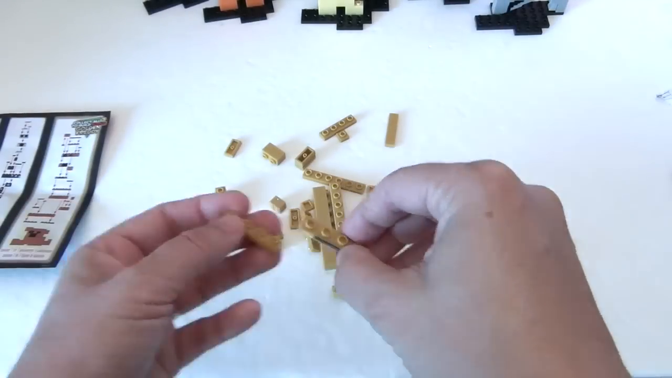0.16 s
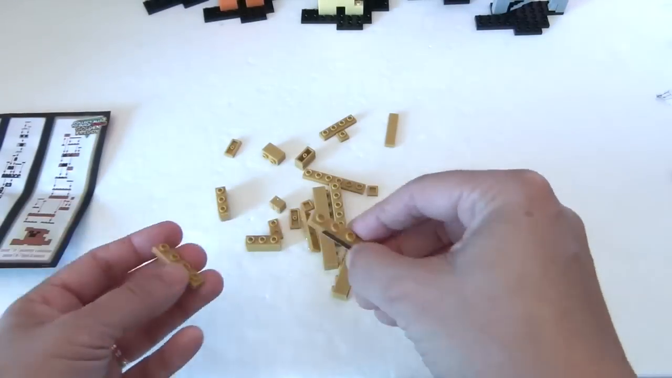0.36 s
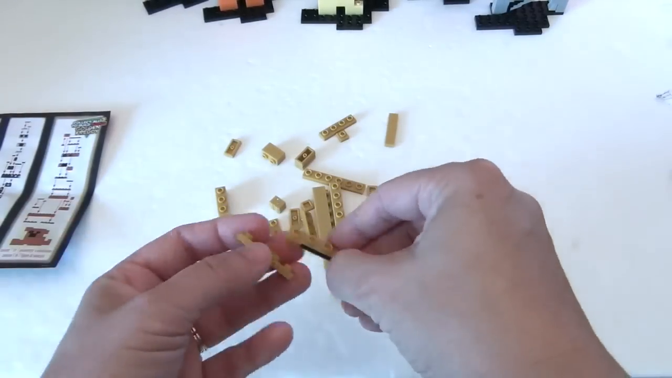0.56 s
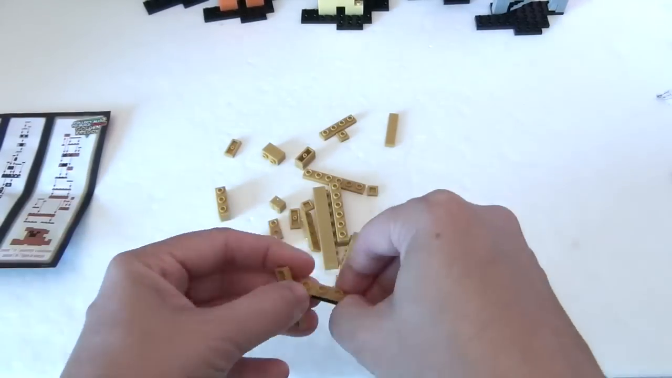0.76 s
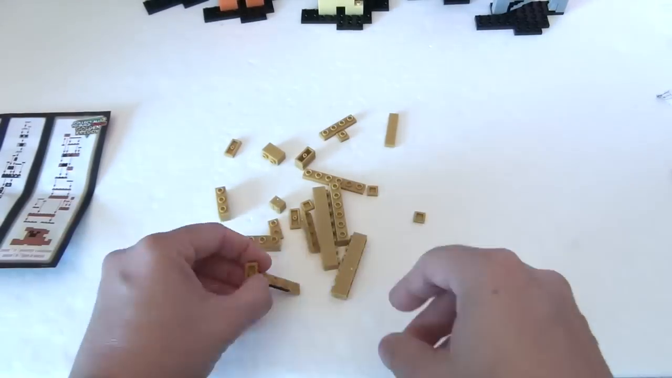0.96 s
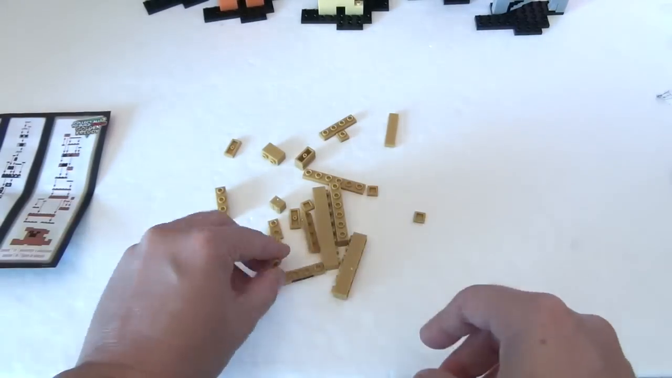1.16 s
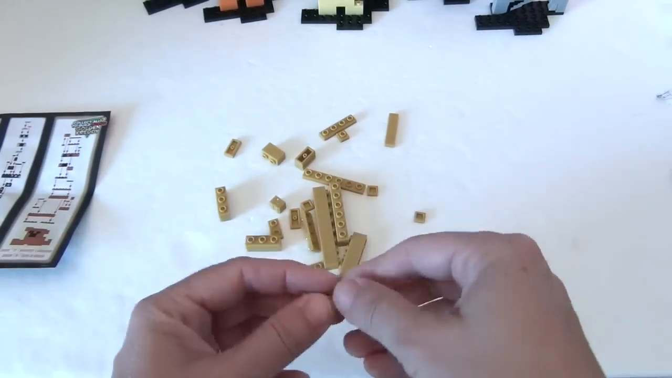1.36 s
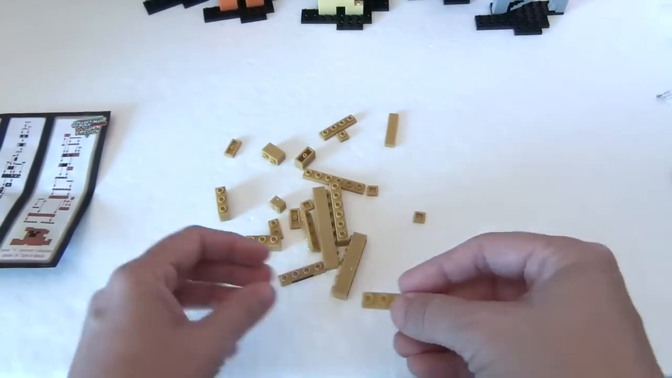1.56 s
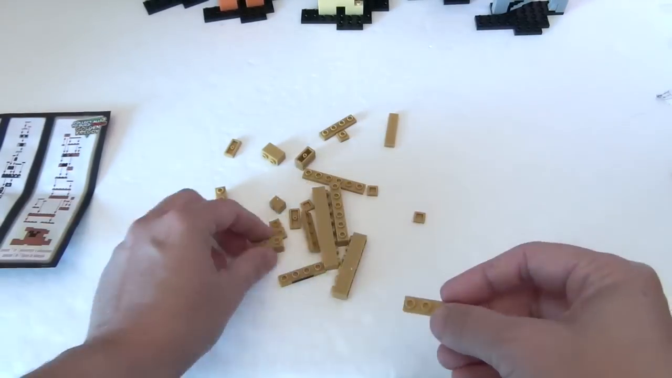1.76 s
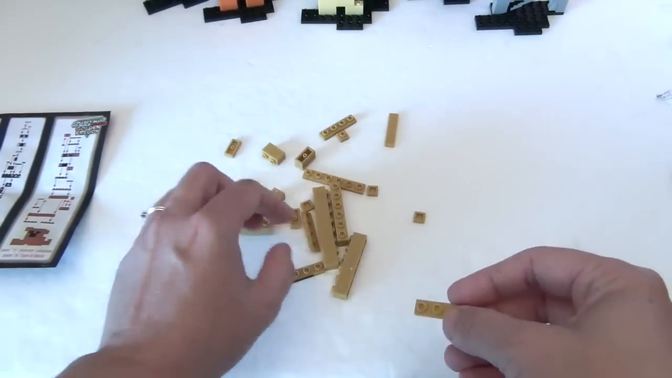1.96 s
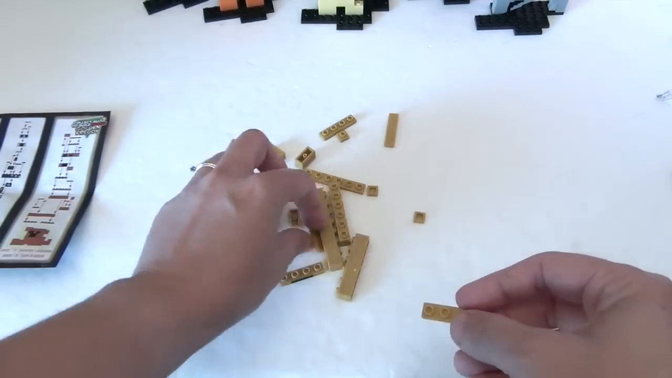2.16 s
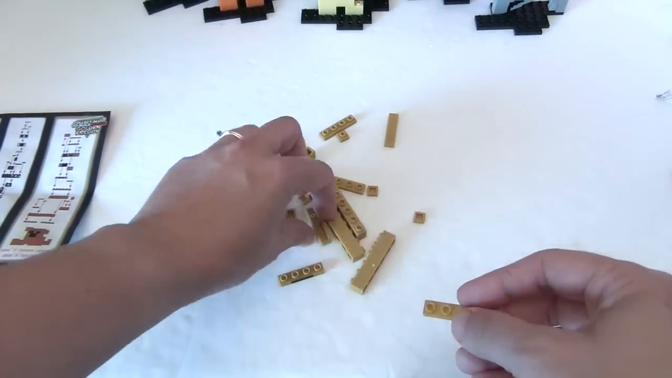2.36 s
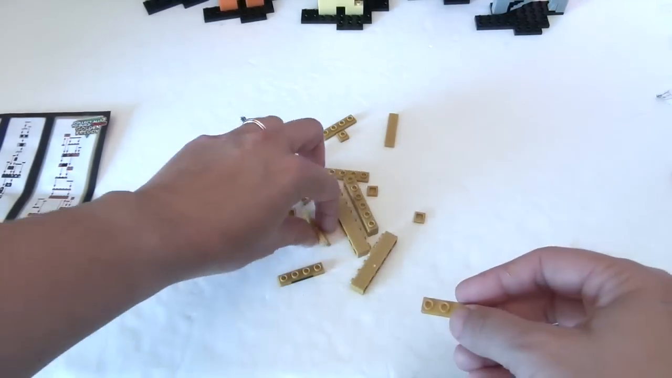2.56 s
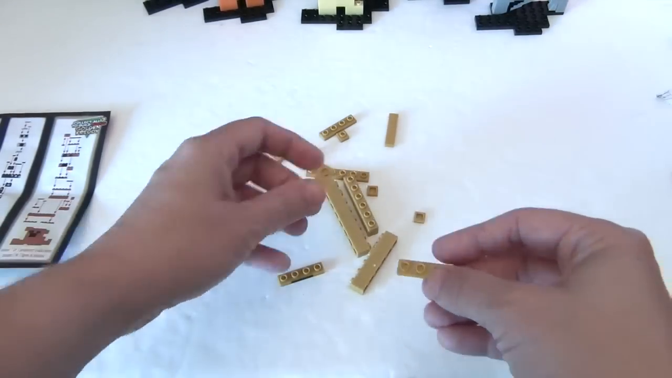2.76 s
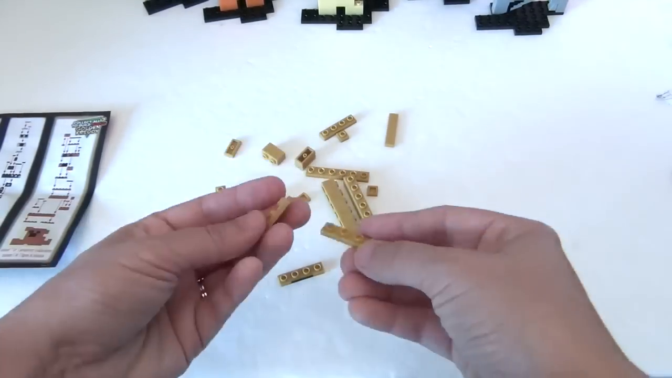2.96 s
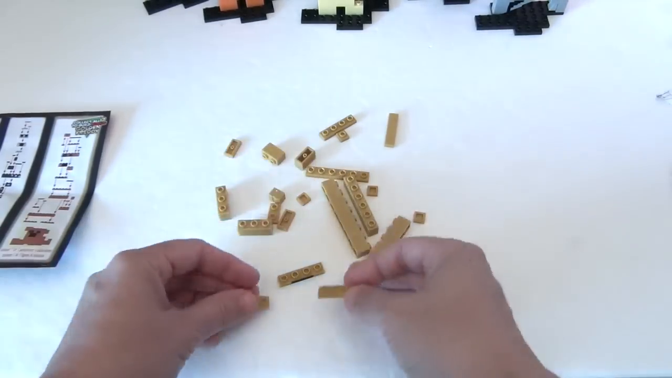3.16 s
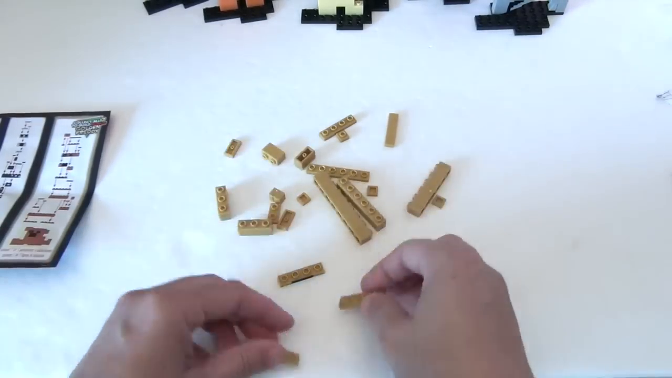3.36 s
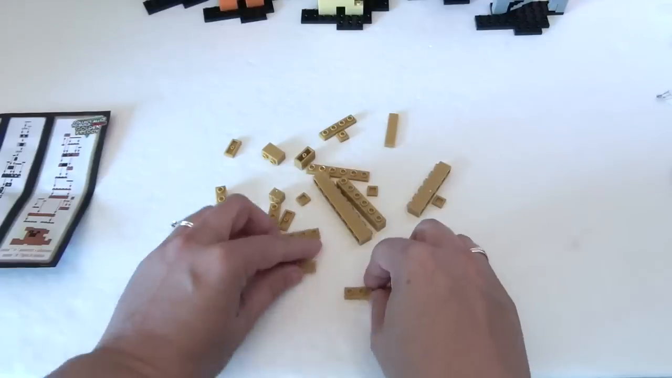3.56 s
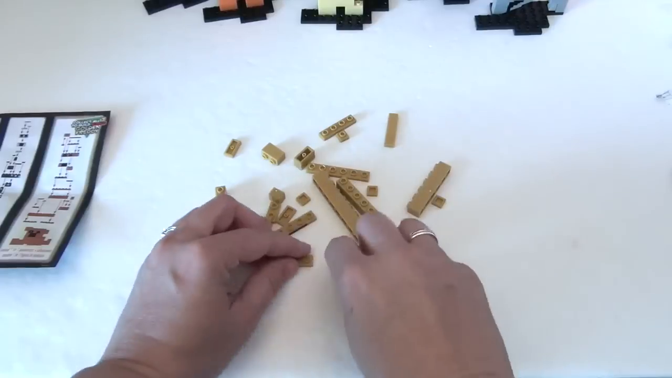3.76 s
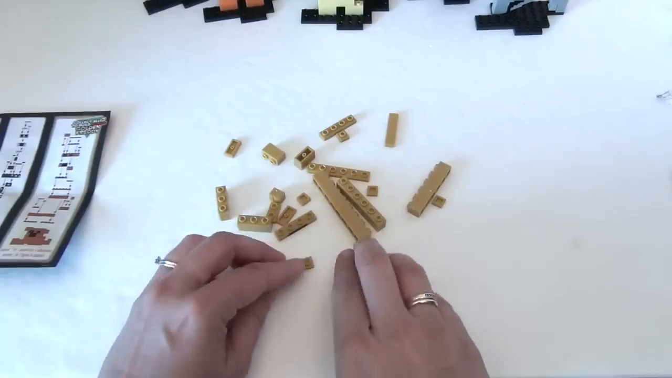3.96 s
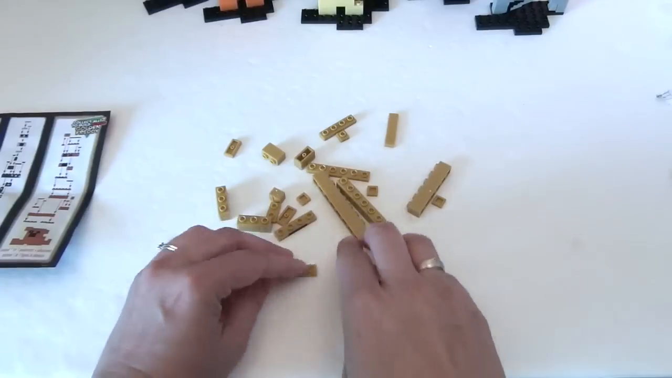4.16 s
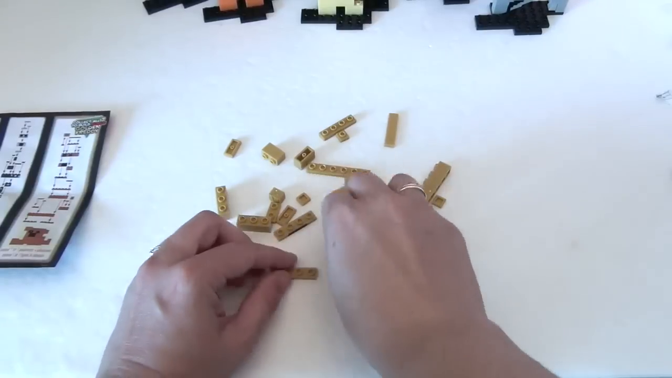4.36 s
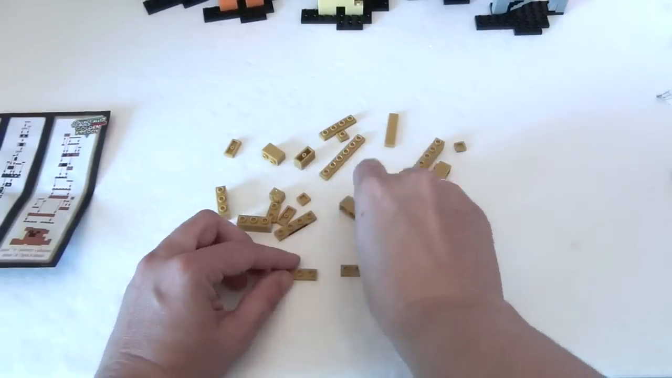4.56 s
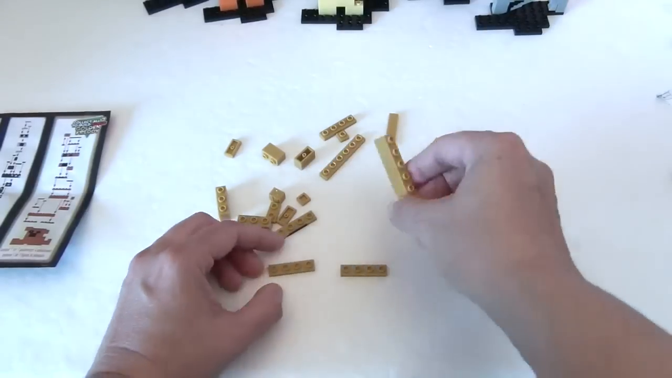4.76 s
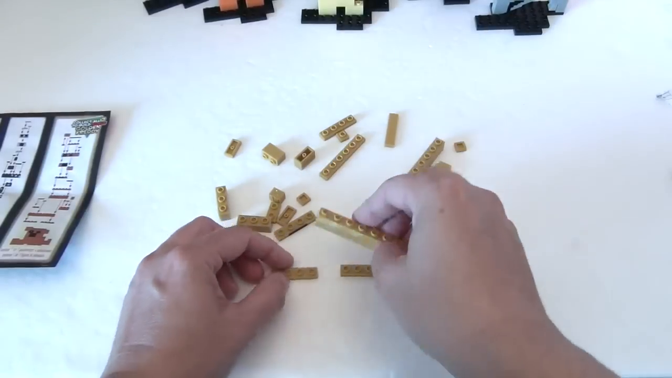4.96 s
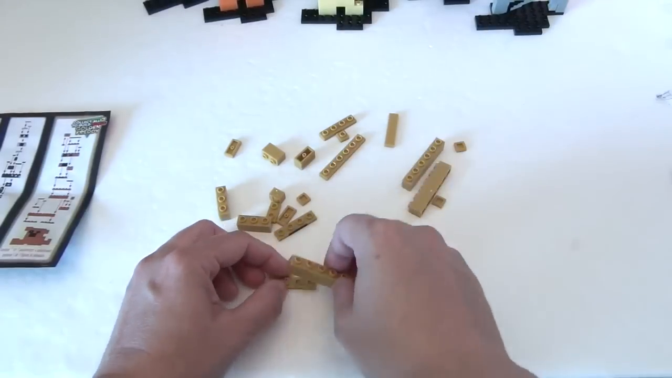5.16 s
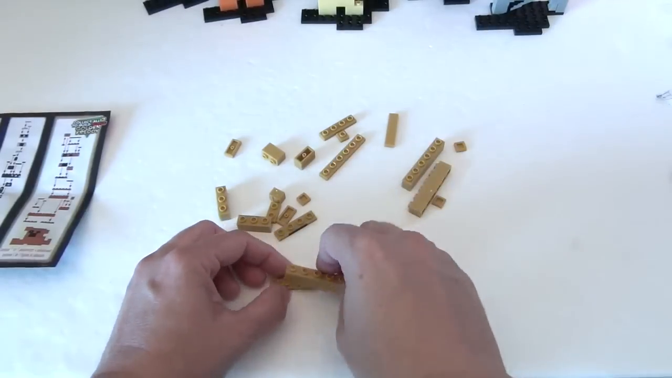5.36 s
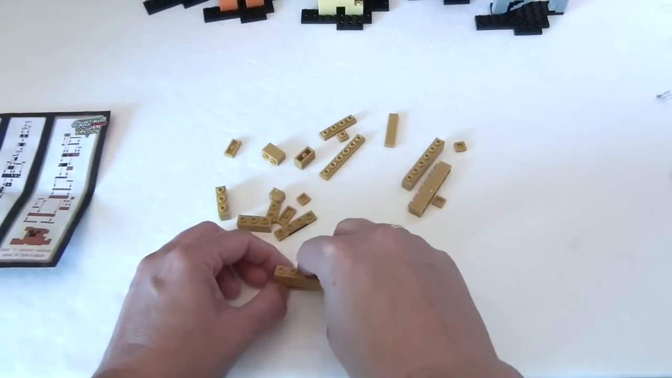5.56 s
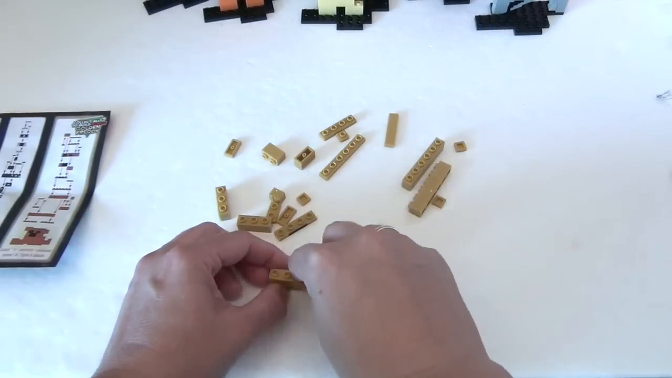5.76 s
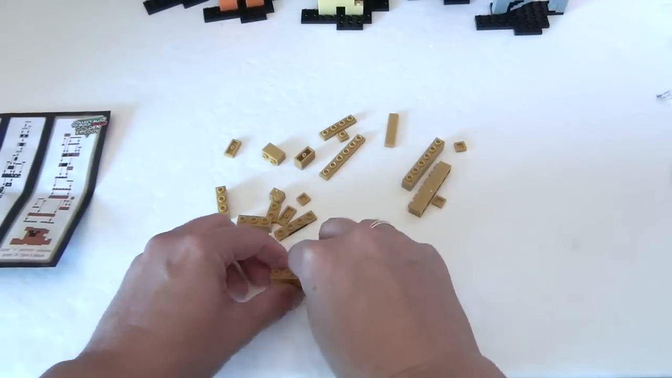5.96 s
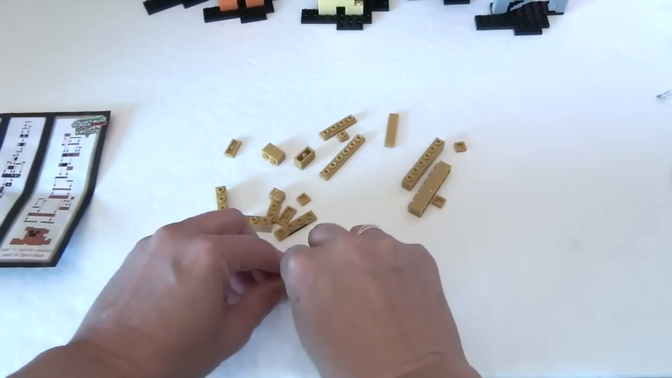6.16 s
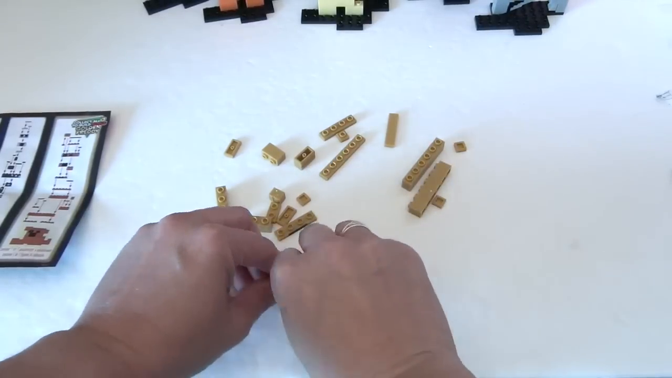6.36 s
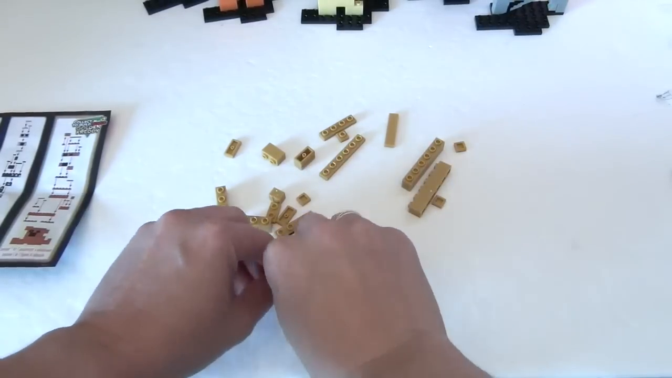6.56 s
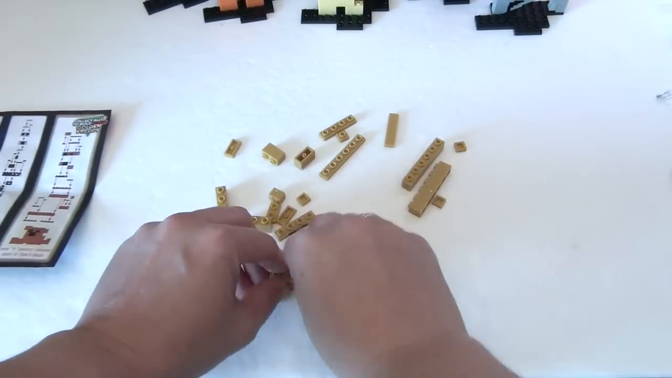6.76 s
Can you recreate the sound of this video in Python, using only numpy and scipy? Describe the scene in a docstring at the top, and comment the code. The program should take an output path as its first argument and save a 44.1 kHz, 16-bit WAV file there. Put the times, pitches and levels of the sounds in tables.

```python
"""Under it all lies low room noise of changing level, with a faint far drone that climbs and fades.
Hands sort small plastic bricks on a table top: bricks click and snap as short bursts of ringing modes.
They slide over the grainy top as coloured trains of tiny catches, with nudging ticks and quick rattles.
Knuckles and presses knock the table, which rings lower and longer than the bricks."""
import sys
import numpy as np
from scipy import signal
from scipy.fft import rfft, irfft
from scipy.io import wavfile
from scipy.ndimage import uniform_filter1d

SR = 44100
rng = np.random.default_rng(int(sys.argv[2]) if len(sys.argv) > 2 else 0)


def unload_wav(signal):
    """Save mono or channel-first audio to the path in sys.argv[1] as 16-bit WAV at rate SR, clipped to [-1, 1]."""
    wavfile.write(
        sys.argv[1],
        SR,
        np.round(np.clip(np.atleast_2d(signal).T, -1, 1) * 32767).astype(np.int16),
    )


N = 300321


def gain_of(db):
    """Decibels to a factor."""
    return 10 ** (np.asarray(db) / 20)


def evened(x):
    """Scales to rms 1."""
    return x / np.sqrt(np.mean(x ** 2) + 1e-20)


def read(points, hz):
    """Reads a table over frequency, on a log axis."""
    f, value = np.transpose(points)
    return np.interp(np.log(hz + 1), np.log(f + 1), value)


def add(mix, s, sound):
    """Mixes a sound in at time s."""
    part = mix[round(s * SR):][:len(sound)]
    part += sound[:len(part)]


def colour(x, points, patchy_db):
    """Shapes x by a spectrum whose bumps drift at random."""
    hz, t, z = signal.stft(x, SR, nperseg=512, noverlap=384)
    patches = rng.standard_normal(z.T.shape)
    patches = uniform_filter1d(patches, size=10, axis=0)  # blurred in time
    patches = evened(uniform_filter1d(patches, size=8, axis=1)).T  # and in frequency
    shape_db = read(points, hz)[:, None] + patchy_db * patches
    shaped = signal.istft(z * gain_of(shape_db), SR, nperseg=512, noverlap=384)[1]
    return evened(shaped[:N])


def echoes(t60, start_s):
    """Sparse taps of random sign that die away, energy 1."""
    at = np.arange(round(start_s * SR), SR // 4, 20)
    taps = np.zeros(SR // 4 + 20)
    signs = rng.choice([-1., 1.], len(at))
    taps[at + rng.integers(0, 20, len(at))] = signs * gain_of(-60 * at / SR / t60)
    return taps / np.linalg.norm(taps)


# The changing level of the room noise. Each row: time in seconds, level between 100 and 1200 Hz in dB.
ROOM_LEVEL = [(0.0, -41.5), (1.02, -41.5), (1.17, -46.5), (1.56, -47.5), (2.07, -42), (2.27, -49.5),
              (3.0, -47), (3.22, -44), (4.32, -37), (4.59, -42.5), (5.9, -39), (6.05, -44), (6.28, -48.5),
              (6.81, -43)]
# Tone of the room noise. Each row: frequency in Hz, relative density in dB per Hz.
ROOM_COLOUR = [(15, -42), (25, -3.5), (76, -19), (114, 7), (145, -13), (243, -4.5), (595, -7), (663, -6.5),
               (1270, -10), (1450, -9.5), (2430, -11), (2860, -14), (14900, -21), (16200, -24)]
# Blurred tones that follow the noise level. Each row: centre in Hz, width in Hz, level at the start in dB.
HUMS = [(236.4, 13, -53), (1272, 24, -53)]
# How alike left and right are. Each row: frequency in Hz, likeness (1 is identical).
ROOM_LIKENESS = [(60, 0.97), (180, 1), (550, 0.69), (1650, 0.31), (4970, 0.31), (15000, 0.81)]


def room_noise():
    """Random short-time spectra, most alike in both channels in the bass, with faint blurred tones."""
    frames, hz = N // 256 + 5, np.fft.rfftfreq(1024, 1 / SR)
    a, b, c, d, patches = rng.standard_normal((frames, 513, 5)).T
    patches = evened(uniform_filter1d(uniform_filter1d(patches, 8, 0), 14, 1))
    power = gain_of(2 * read(ROOM_COLOUR, hz))
    power /= power[(hz > 100) & (hz < 1200)].sum()
    start_power = gain_of(2 * ROOM_LEVEL[0][1])
    for f, width, db in HUMS:
        peak = np.exp(-2 * ((hz - f) / width) ** 2)
        power = power + gain_of(2 * db) / start_power * peak / peak.sum()
    same = np.clip(read(ROOM_LIKENESS, hz), -1, 1)[:, None]
    left = a + 1j * b
    right = same * left + np.sqrt(1 - same ** 2) * (c + 1j * d)
    z = np.array([left, right])
    z *= np.sqrt(power)[:, None] * gain_of(1.2 * patches)
    noise = signal.istft(z, nperseg=1024, noverlap=768)[1][:, :N]
    s, db = np.transpose(ROOM_LEVEL)
    level = gain_of(np.interp(np.arange(N) / SR, s, db))
    return evened(noise) * np.sqrt(power.sum()) * level


# A faint far drone that climbs and fades. Each row: time in seconds, pitch in Hz, mean level in dB.
DRONE = [(0, 115, -50), (1.09, 123.2, -58), (1.299, 124.6, -62), (2.1, 134, -46.5), (2.4, 138.2, -60.5),
         (3.0, 141, -60)]
DRONE_OCTAVE_DB, DRONE_WAVER_DB = -7, 3.5  # octave against the low tone; rms waver


def drone():
    """A low tone and its octave, wavering in strength, fading at 20 dB per second after the last point."""
    s, hz, db = np.transpose(DRONE)
    t = np.arange(N) / SR
    phase = 2 * np.pi * np.cumsum(np.interp(t, s, hz)) / SR
    waver = evened(uniform_filter1d(rng.standard_normal(N), size=5000))
    fade_db = 20 * np.maximum(t - s[-1], 0)
    level = gain_of(np.interp(t, s, db) - fade_db + DRONE_WAVER_DB * waver)
    return np.sqrt(2) * level * (np.sin(phase) + gain_of(DRONE_OCTAVE_DB) * np.sin(2 * phase))


# Bricks striking. Each row: start in seconds, strength of the middle modes in dB (they peak 8 dB above it),
# low modes above that in dB, high modes above that in dB.
CLICKS = [(.1156, -30, -5, -7), (.6385, -24, -9, 1), (.6531, -21, -10, -5), (.6674, -21, -15, 4),
          (.9956, -10, -8, -2), (1.0467, -12, -15, -1), (1.1421, -18, -15, -2), (1.1475, -3, -7, -4),
          (1.1668, -5, -7, -3), (1.1705, -15, -13, 2), (1.1807, -10, -9, -1), (1.1892, -21, -5, -2),
          (1.7508, -16, -9, 1), (1.7577, -18, 2, 1), (1.8295, -20, -12, 1), (1.9084, -2, -3, -6),
          (1.9165, -6, -6, -7), (1.9193, -3, -8, -8), (1.9225, -7, -3, -2), (1.9273, -10, -7, -7),
          (1.931, -7, -2, -12), (1.9333, -10, -8, -10), (1.936, -8, -3, -12), (1.9392, -14, -1, -5),
          (1.9412, -7, -5, -10), (2.0418, -35, -1, -4), (2.1168, -29, -15, -13), (2.136, -26, -10, -1),
          (2.1437, -20, -9, -5), (2.151, -14, -9, -3), (2.1566, -5, -12, 1), (2.1588, -7, -14, -5),
          (2.1802, -19, 0, -4), (2.186, -14, -12, -5), (2.191, -11, -18, 0), (2.1966, -4, -18, -5),
          (2.1985, -4, -18, -13), (2.2083, -9, -18, -9), (2.2145, -15, -1, -8), (2.2229, -17, -4, -4),
          (2.2321, -5, -16, -1), (2.2379, -8, -4, -2), (2.2506, -8, -5, -4), (2.2592, -17, -3, -3),
          (2.3511, -28, -13, 4), (2.4699, -14, -7, 10), (2.5034, -21, -14, 4), (2.5237, -27, -16, -1),
          (2.5865, -13, -10, 1), (3.0759, -20, -11, 1), (3.188, -14, -15, 0), (3.2166, -16, -15, 5),
          (3.3906, -8, -5, -6), (3.4685, -10, -19, -3), (3.509, -15, 2, 0), (3.514, -19, 3, 6),
          (3.5702, -9, 0, 3), (3.5873, -9, -2, 4), (3.5958, -16, -8, 2), (3.6521, -20, -3, 2),
          (3.6574, -19, -5, -3), (3.6872, -22, -10, 7), (3.6961, -15, -8, 3), (4.0218, -22, 7, 0),
          (4.1534, -23, 2, 4), (4.1608, -21, -2, 0), (4.2541, -21, 0, -2), (4.2727, -11, -10, -2),
          (4.3938, -6, -22, -3), (4.4277, -15, -14, -6), (4.4375, -10, -12, 0), (4.4476, -5, 0, -3),
          (4.4535, -8, -15, -4), (4.4694, -16, -2, -1), (4.552, -19, -17, 0), (4.6731, -19, -8, 1),
          (4.6794, -16, -8, -2), (4.9571, -18, -12, -3), (5.131, -27, 2, 0), (5.1345, -25, -3, 1),
          (5.3462, -25, -15, 2), (5.567, -33, -12, 0), (5.7003, -19, -8, 1), (5.9724, -21, 7, 0),
          (6.0492, -3, -19, -1), (6.0503, -8, -15, -1), (6.4702, -26, -5, -2), (6.5899, -3, -12, -3),
          (6.5915, -9, -6, -9), (6.7298, -34, 1, -7), (6.8024, -27, -12, 1)]
# What a brick on the table rings with. Each row: mode in Hz, relative level in dB, nominal t60 in seconds.
BRICK_MODES = [(1750, -6, .006), (2000, -1, .006), (2730, 1, .006), (3400, -1, .004), (4900, -9, .003),
               (5650, -6, .003), (6800, 0, .0045), (7550, -1.5, .004), (8300, -2, .0035), (9500, -1, .003),
               (10500, -1, .003), (11900, -3, .003), (13400, -5, .003), (15050, -3.5, .004)]
LOW_HZ, HIGH_HZ = 4200, 9000  # borders of the mode groups


def clicks(blows):
    """Each blow rings the brick modes, detuned and weighted anew since every brick and grip differs."""
    hz, db, t60 = np.transpose(BRICK_MODES)[:, :, None]
    group = np.searchsorted([LOW_HZ, HIGH_HZ], hz[:, 0])
    t, out = np.arange(1500) / SR, np.zeros(N)
    onset = 1 - np.exp(-(t / .0001) ** 2)
    contact = onset * (1 + .9 * np.exp(-t / .0003))  # a sharp crack leads the ring
    chance = rng.standard_normal((len(blows), 3, len(BRICK_MODES), 1))
    for (s, strength_db, low_db, high_db), (tune, weight, ring) in zip(blows, chance):
        share_db = np.array([low_db, 0, high_db])
        # a group that stands out belongs to a loosely held brick: fewer modes, longer ring
        excess_db = share_db - np.sort(share_db)[1] - 5
        loose = 1 + np.maximum(excess_db, 0)[group, None] / 4
        ring_s = t60 * loose * np.exp(.2 * ring)
        decay = gain_of(db * loose + 2.5 * weight - 60 * t / ring_s)
        mode_hz = hz * (1 + .03 * tune / loose)
        modes = contact * decay * np.sin(2 * np.pi * mode_hz * t)
        for k in range(3):
            part = modes[group == k].sum(0)
            part = part / abs(part).max() * 2.5  # the 8 dB above the strength
            add(out, s, gain_of(strength_db + share_db[k]) * part)
    # keeps the clicks free of bass
    return signal.sosfilt(signal.butter(3, 1500, "high", fs=SR, output="sos"), out)


# Bricks pushed over the top. Each row: start of full speed in seconds, run-up in seconds, hold in seconds,
# level in dB, drag against the top above that in dB.
PUSHES = [(.973, 0.0033, 0.017, -29.5, -9), (0.998, 0.015, .055, -18.5, -11),
          (1.088, 0.013, .065, -33, -1.5), (1.167, .003, 0.022, -26, -4), (1.689, 0.0049, 0.018, -41, -17),
          (1.734, 0.0056, 0.015, -31.5, -28), (1.747, .03, 0.01, -21.5, -11), (1.785, .02, .09, -28.5, -9),
          (1.873, 0.057, 0.0089, -24.5, -12.5), (1.908, 0.0016, 0.045, -31.5, 6),
          (2.147, 0.027, 0.018, -26, -3.5), (2.176, .004, 0.0097, -25, -12), (2.19, 0.008, 0.004, -19, -13),
          (2.202, 0.0063, 0.018, -27, -6.5), (2.232, 0.0036, .022, -25, -1.5),
          (2.357, 0.0038, 0.014, -40.5, -23), (2.476, 0.017, 0.0044, -23.5, -10),
          (2.488, 0.0047, .03, -33.5, -7.5), (2.569, 0.01, 0.018, -28.5, -9),
          (2.605, 0.017, .035, -41.5, -16), (3.074, 0.0017, 0.017, -29.5, -11),
          (3.127, 0.031, 0.11, -21, -14), (3.216, 0.007, .013, -15, -25), (3.245, 0.033, 0.041, -23, -16.5),
          (3.339, 0.045, 0.033, -19, -20.5), (3.395, 0.022, 0.058, -21, -9.5), (3.484, .06, .015, -8, -19),
          (3.521, 0.022, .09, -17.5, -13), (3.613, 0.011, 0.055, -28, -5.5),
          (3.69, 0.033, 0.011, -19.5, -13), (3.789, 0.041, 0.012, -30, -11), (3.844, .006, .03, -24, -10.5),
          (3.883, .03, 0.095, -22, -9.5), (4.018, 0.018, 0.0092, -31.5, -2.5), (4.078, .06, .09, -25, -10),
          (4.222, .04, .045, -24.5, -21), (4.311, 0.036, .05, -21.5, -8.5), (4.395, 0.0023, .035, -25, -9),
          (4.441, 0.003, 0.0077, -12, -9.5), (4.463, 0.022, 0.064, -21.5, -9.5),
          (4.552, .02, .02, -18, -14.5), (4.59, .02, 0.032, -29, -15), (4.672, 0.011, .015, -30, -11.5),
          (4.74, 0.11, .1, -29, -13.5), (4.879, 0.05, .025, -27.5, -11), (4.946, 0.026, 0.015, -25, -12),
          (5.024, 0.08, .035, -31, -10), (5.071, 0.017, 0.015, -37.5, -15), (5.128, 0.0033, .03, -33, -6),
          (5.197, .02, .04, -38.5, -13), (5.329, 0.036, 0.018, -32.5, -16), (5.403, 0.014, 0.061, -38, -5),
          (5.487, .03, .03, -39, -6), (5.701, 0.0055, 0.064, -38, -10), (5.911, 0.026, .03, -34, -8),
          (5.95, 0.0092, 0.0092, -18, -13.5), (5.999, 0.016, 0.0038, -34.5, -2),
          (6.034, 0.029, 0.013, -33, -6), (6.049, 0.0015, .015, -20.5, -15),
          (6.112, 0.022, 0.011, -40, -18), (6.204, .02, 0.012, -42, -25), (6.39, .05, .01, -35.5, -14),
          (6.467, 0.014, .01, -36.5, -7), (6.571, .01, .015, -41, -13), (6.644, .025, .015, -38, -18),
          (6.8, .01, 0.011, -33.5, -10)]
RUN_UP_DB, SAG_DB_PER_S, FALL_DB_PER_S = 23.5, 26.5, 552  # rise over the run-up, sag, extra fall after the hold
# A struck brick skids away: start against the click strength, fall, drag above the skid.
SKID_DB, SKID_FALL_DB_PER_S, SKID_DRAG_DB = -24, 900, -5


def sliding_levels():
    """Level of all sliding and of its drag: each push rises, holds and peters out; each click leaves a skid."""
    t, power = np.arange(0, N / SR + .002, .001), 0
    for s, run_up, hold, db, drag_db in PUSHES:
        rise_db = RUN_UP_DB / max(run_up, .001) * np.maximum(s - t, 0)
        sag_db = SAG_DB_PER_S * np.maximum(t - s, 0)
        fall_db = FALL_DB_PER_S * np.maximum(t - s - hold, 0)
        stroke_db = db - rise_db - sag_db - fall_db
        power = power + gain_of(2 * (stroke_db + np.array([[0], [drag_db]])))
    for s, strength_db, *_ in CLICKS:
        skid_db = strength_db + SKID_DB - SKID_FALL_DB_PER_S * abs(t - s)
        power = power + (t > s) * gain_of(2 * (skid_db + np.array([[0], [SKID_DRAG_DB]])))
    return [np.interp(np.arange(N) / SR, t, np.sqrt(p)) for p in power]


# Bright hiss of the slide. Each row: frequency in Hz, relative density in dB per Hz.
SLIDE_COLOUR = [(2350, -66), (4000, -37), (5000, -9.5), (5580, -6), (6250, -3), (6690, -2), (7000, -2),
                (7580, -1.5), (7900, -3), (8970, -1.5), (10700, -3.5), (14900, -7), (16200, -23)]
# Duller drag of a pressed brick. Each row: frequency in Hz, relative density in dB per Hz.
DRAG_COLOUR = [(150, -16), (300, -11), (700, -12), (1380, -7), (1560, -13), (1750, 0), (2050, 0),
               (2400, -6), (2740, 1), (3050, -3), (4500, -5), (6000, -30)]


def slides(level, drag):
    """Brick edges catch on the grain some 20000 times a second; pressing down adds a duller drag."""
    force = gain_of(1.5 * np.minimum(rng.exponential(1, N), 3)) * rng.standard_normal(N)
    catches = force * (rng.random(N) < 20000 / SR)
    judder = gain_of(1.9 * evened(uniform_filter1d(rng.standard_normal(N), size=90)))  # speed is uneven
    catches = catches * judder
    dull = colour(catches, DRAG_COLOUR, patchy_db=1.5)
    return level * colour(catches, SLIDE_COLOUR, patchy_db=3.0) + drag * dull


# Dropped bricks rattling to rest. Each row: start in seconds, length in seconds, first strength in dB.
RATTLES = [(1.944, .016, -18), (2.252, .016, -24)]
RATTLE_GAP_S, RATTLE_FALL_DB_PER_S = .0025, 500
RATTLE_LOW_DB, RATTLE_HIGH_DB = -1, -6  # low and high modes above the middle ones
# Sliding bricks nudge each other: strength above the sliding level, low and high modes above that.
TICK_COUNT, TICK_DB, TICK_LOW_DB, TICK_HIGH_DB = 130, -2, -9, 0
SMALL_SPREAD_DB = 3  # random spread of every strength and mode share


def small_blows(level):
    """Uneven, fading bounces within each rattle, and ticks scattered where the sliding is brisk."""
    rows = []
    for s, length, db in RATTLES:
        t = np.arange(0, length, RATTLE_GAP_S)
        t = t + RATTLE_GAP_S * rng.random(len(t)) / 2
        rows += [(s + u, db - RATTLE_FALL_DB_PER_S * u, RATTLE_LOW_DB, RATTLE_HIGH_DB) for u in t]
    brisk = np.cumsum(np.sqrt(level))
    for at in np.searchsorted(brisk, brisk[-1] * rng.random(TICK_COUNT)):
        rows += [(at / SR, 20 * np.log10(level[at]) + TICK_DB, TICK_LOW_DB, TICK_HIGH_DB)]
    chance = np.clip(rng.standard_normal((len(rows), 4)), -2, 2)
    return np.array(rows) + SMALL_SPREAD_DB * chance * [0, 1, 1, 1]  # times stay put


# Knocks on the table top. Each row: start in seconds, peak before the bass cut in dB, hardness in dB per octave.
KNOCKS = [(1.9084, -29, 2), (2.232, -27, 0), (3.0757, -22, 2), (4.4475, -28, 2), (5.7003, -23, -4),
          (5.712, -20, -3), (5.737, -22, -3), (5.972, -27, 0), (6.4698, -22, 2), (6.5895, -6.5, 1.5),
          (6.5913, -13, 4), (6.73, -29, 3)]
# What the table top rings with. Each row: mode in Hz, relative level in dB, t60 in seconds.
TABLE_MODES = [(85, -12, .12), (135, -5, .08), (190, -4, .06), (250, 3, .07), (310, 0, .05),
               (420, -6, .035), (550, -5, .04), (650, -8, .03), (780, -4, .03), (930, -5, .035),
               (1440, -4, .025), (1960, -4, .022), (2750, -10, .015)]


def knocks():
    """The table top rings low; a hard blow lifts its upper modes."""
    hz, db, t60 = np.transpose(TABLE_MODES)[:, :, None]
    t, out = np.arange(SR // 4) / SR, np.zeros(N)
    tunes = rng.standard_normal((len(KNOCKS), len(TABLE_MODES), 1))
    for (s, peak_db, hard_db), tune in zip(KNOCKS, tunes):
        lift_db = hard_db * np.log2(np.maximum(hz / 250, 1))
        decay = gain_of(db + lift_db - 60 * t / t60)
        modes = decay * np.sin(2 * np.pi * hz * (1 + 0.025 * tune) * t)
        ring = modes.sum(0) * (1 - np.exp(-t / .0004))  # soft onset
        add(out, s, gain_of(peak_db) * ring / abs(ring).max())
    # keeps the knocks free of the deepest bass
    return signal.sosfilt(signal.butter(4, 68, "high", fs=SR, output="sos"), out)


# Stereo spread of the bricks and table. Each row: frequency in Hz, side gain in dB.
WIDTH = [(60, -36), (180, -46), (550, -17), (1650, -63), (4970, -19.5), (15000, -9)]


def scene():
    """The bricks lie in the middle; near echoes widen them, the room adds a short tail."""
    level, drag = sliding_levels()
    blows = clicks(CLICKS) + clicks(small_blows(level))
    rubs = slides(level, drag)
    # echoes off hands and neighbouring bricks
    blows += gain_of(-12) * signal.oaconvolve(blows, echoes(t60=.012, start_s=.0008))[:N]
    thuds = knocks()
    # the top shudders
    blows += thuds + gain_of(-8) * signal.oaconvolve(thuds, echoes(t60=.09, start_s=.008))[:N]
    near = blows + rubs
    near += gain_of(-21) * signal.oaconvolve(near, echoes(t60=.12, start_s=.004))[:N]  # room tail
    # blows throw sound sideways more than slides do
    side = signal.oaconvolve(blows + gain_of(-10.0) * rubs, echoes(t60=0.058, start_s=.0003))[:N]
    side_gain = gain_of(read(WIDTH, np.fft.rfftfreq(N, 1 / SR)))
    side = irfft(rfft(side) * side_gain, N)
    return np.array([near + side, near - side]) + room_noise() + drone()


EDGE_HZ = 15800  # upper band limit


def record(dry):
    """Clips whatever exceeds full scale, then limits the band."""
    clipped = np.clip(dry, -1, 1)
    lowpass = signal.firwin(255, EDGE_HZ, window=("kaiser", 7), fs=SR)
    return signal.oaconvolve(clipped, lowpass[None], "same")


dry = scene()
out = record(dry)
unload_wav(out)
```